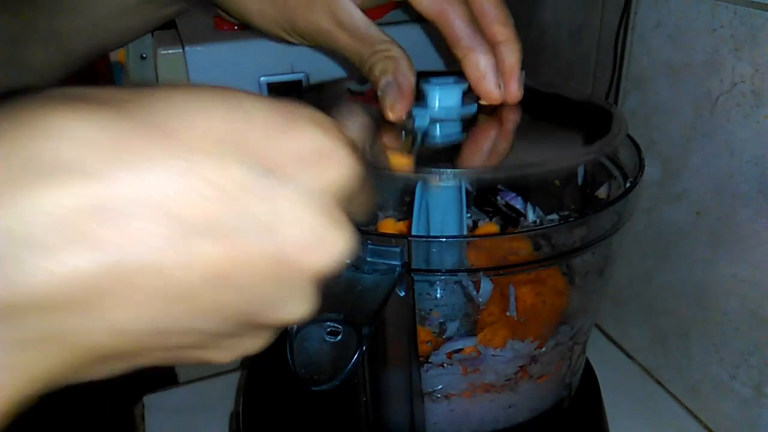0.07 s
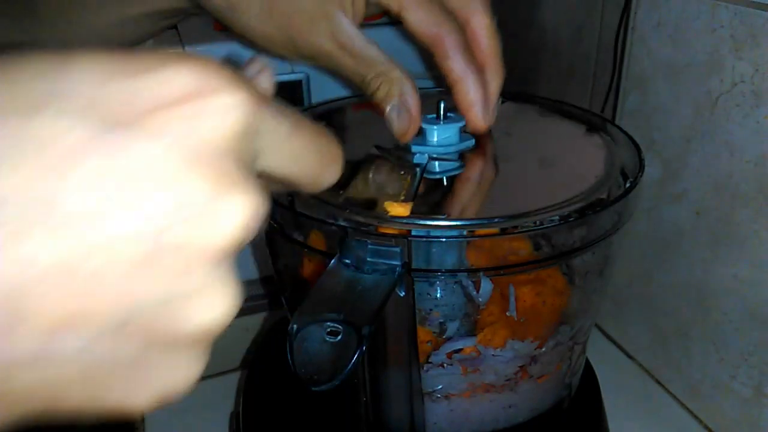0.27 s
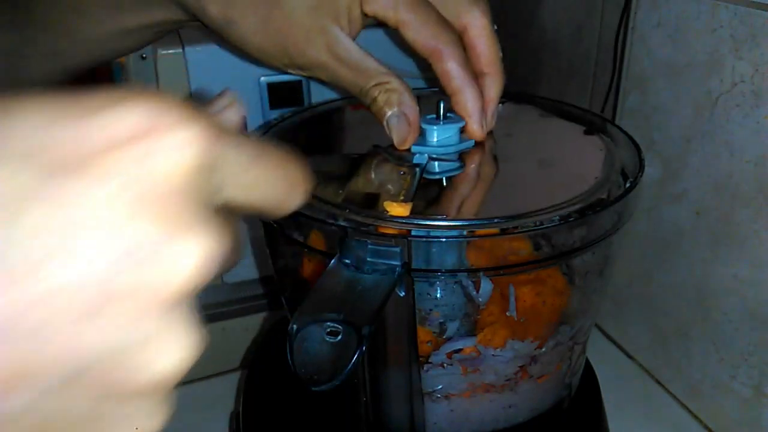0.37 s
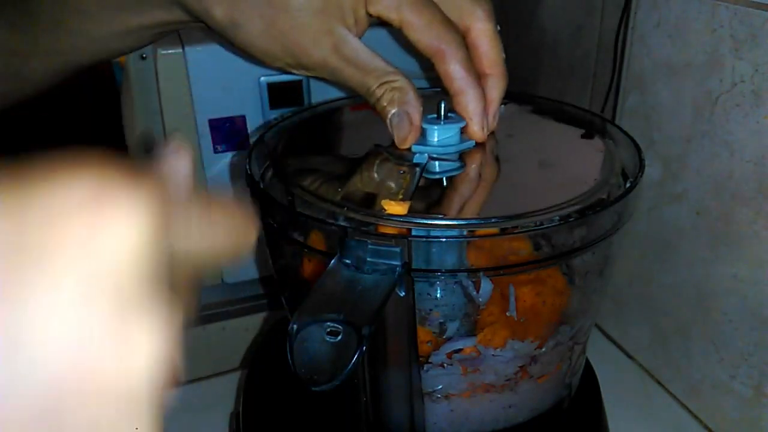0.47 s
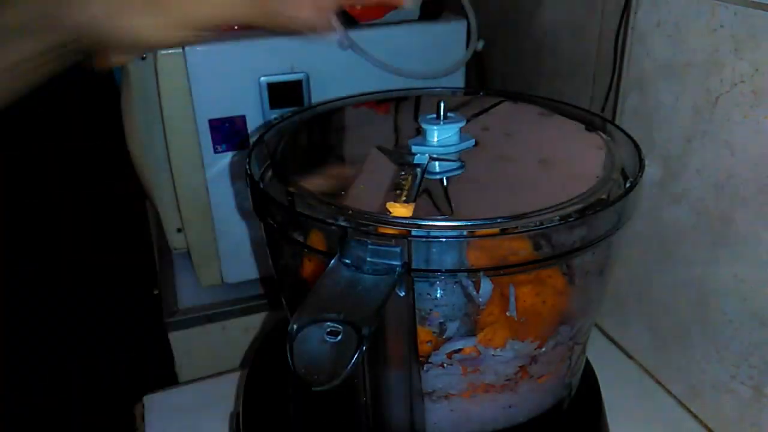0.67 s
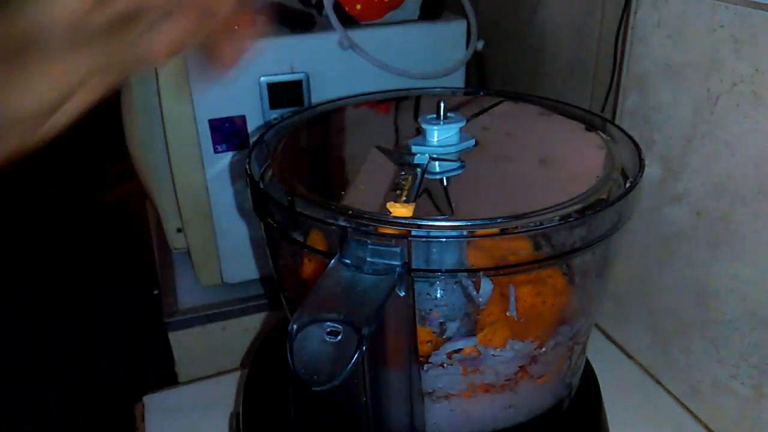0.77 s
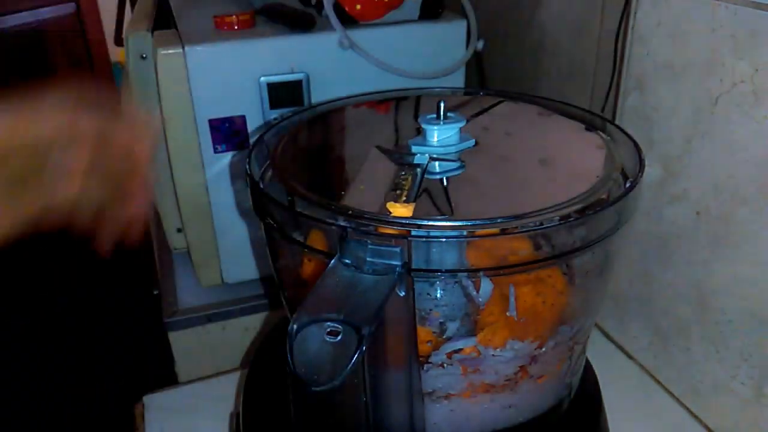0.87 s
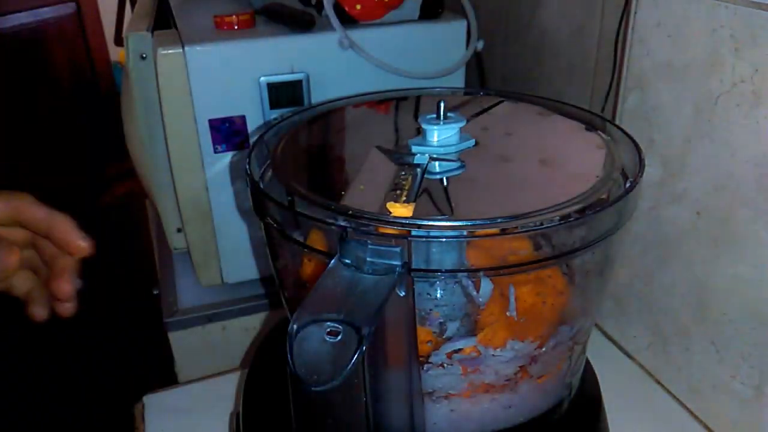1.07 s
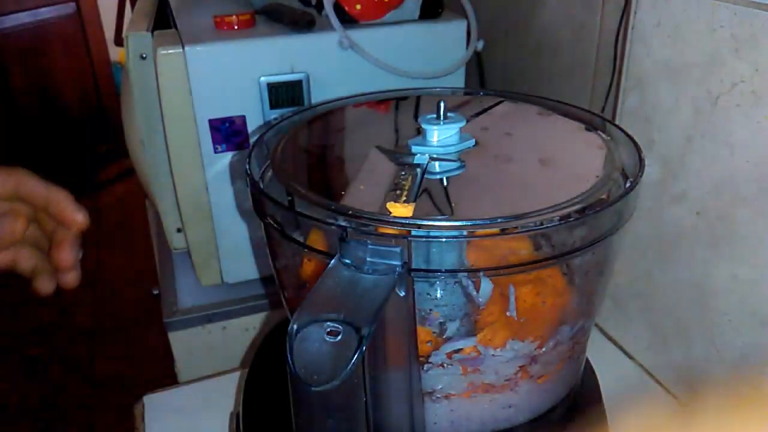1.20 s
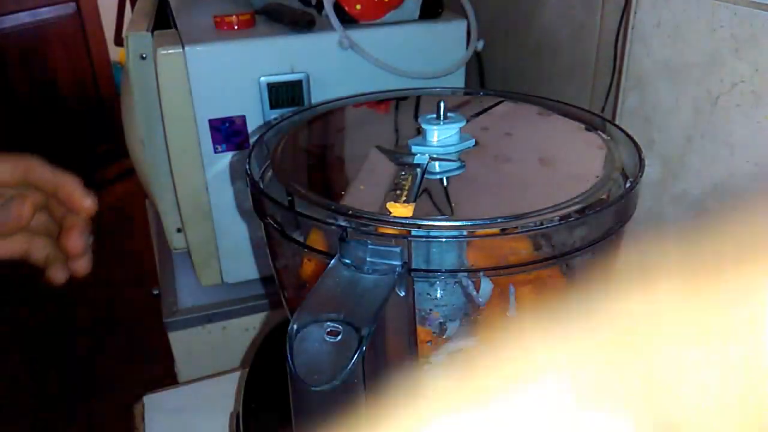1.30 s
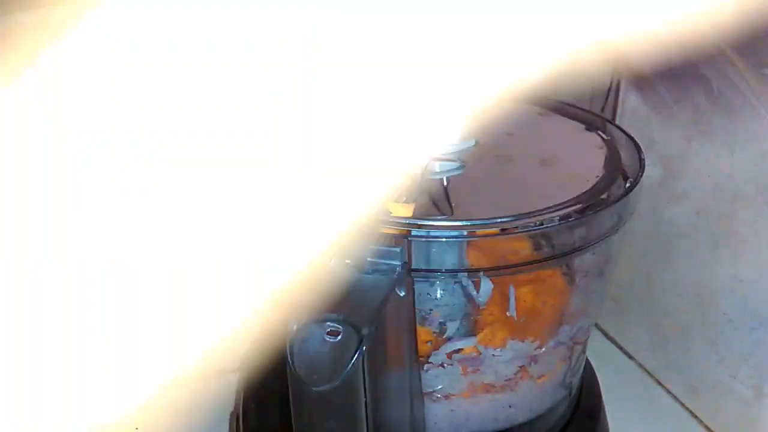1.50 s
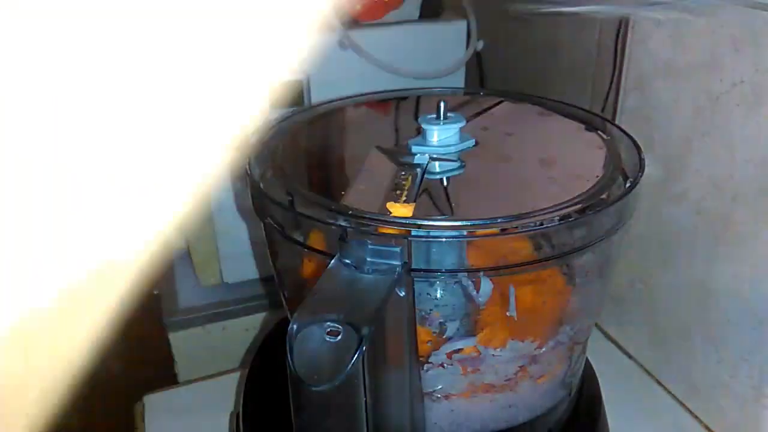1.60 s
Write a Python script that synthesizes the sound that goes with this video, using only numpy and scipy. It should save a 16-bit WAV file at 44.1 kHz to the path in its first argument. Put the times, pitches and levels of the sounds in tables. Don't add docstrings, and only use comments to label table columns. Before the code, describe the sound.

Food processor parts clack and clatter as a disc drops onto a plastic bowl and rattles into place

```python
import sys
import numpy as np
from scipy import signal
from scipy.fft import rfft, irfft
from scipy.io import wavfile

SR = 44100
rng = np.random.default_rng(int(sys.argv[2]) if len(sys.argv) > 2 else 0)


def voltage_ratio(level):
    return 10 ** (np.asarray(level, float) / 20)


def put_to_file(sound):
    columns = np.atleast_2d(sound).T
    safe = np.clip(columns, -1, 1)
    whole_steps = np.round(safe * 32767)
    wavfile.write(sys.argv[1], SR, whole_steps.astype(np.int16))


N = 72765

# pitch_hz, level_db_rms
HUM_LINES = [(58.7, -57), (119, -70), (177, -71.5), (295, -73.5)]
# frequency_hz, level_db
RUMBLE_SPECTRUM = [(11, 0), (25, -2), (36, -12), (55, -16), (85, -12), (110, -20)]
RUMBLE_DB, RUMBLE_LEFT_DB, RUMBLE_TURN_RAD = -60, 3, 0.96
# frequency_hz, level_db
AIR_SPECTRUM = [(53, -31), (90, 2), (296, -5), (488, -13), (521, -6), (1020, -18), (1110, -27),
                (4500, -35.5), (7820, -31.5), (16000, -33)]
AIR_DB = -60.5


# start_s, peak_db, contact_ms, tilt_db_per_octave, ring_db
DISC_DROPS = [
    (0.052, -58.5, 1.2, -3, 4.5),
    (0.2003, -8.5, 5.6, 3, 2),
    (0.2625, -9, 4.05, 2.5, 1.5),
    (0.268, -22, 1.1, -8, 5.5),
    (0.2968, -20.5, 7.7, 2, 5.5),
    (0.322, -33.5, 11, -8.5, 12),
    (0.339, -36.5, 5.5, 5, 8),
    (0.2003, -5.5, 0.48, 4.5, -23.5),
]
# frequency_hz, level_db
DROP_CRACK = [(400, -34), (750, 13.5), (1080, 2.5), (1600, 2), (3300, -0.5), (7500, -8.5), (9500, -18),
              (15500, -25.5)]
# pitch_hz, level_db, t60_s
BOWL_MODES = [(123.5, -14.5, 0.29), (199, -25, 0.24), (502, -15.5, 0.46), (535.3, -12.5, 0.41),
              (556, -9, 0.34), (606.6, -7.5, 0.19), (651, -3.5, 0.23), (714, -3.5, 0.087),
              (804, -2.5, 0.036), (806, -5.5, 0.16), (848, 0, 0.1), (950, -10, 0.031), (1292, -8, 0.071),
              (1548, -14, 0.089)]
# pitch_hz, level_db, t60_s
DISC_MODES = [(1998, -15, 0.05), (2230, -13.5, .11), (2854, -14.5, 0.052), (3383, -14, 0.097),
              (3590, -20, .05), (4008, -19, 0.12), (4270, -25, 0.063), (5510, -15.5, 0.059),
              (6680, -21, 0.058), (6930, -16, 0.021), (7700, -19.5, 0.04)]

# time_s, level_db
SLIDE_LEVEL = [
    (0.08, -104),
    (0.13, -69),
    (0.17, -56),
    (0.198, -45.5),
    (0.21, -45.5),
    (0.96, -93),
    (0.995, -66.5),
    (1.05, -55.5),
    (1.15, -55),
    (1.2, -106),
]
# frequency_hz, level_db
RUB_COLOUR = [(300, -7), (700, 1), (1500, 2), (3000, -9), (7500, -9.5), (15500, -20)]

# start_s, peak_db, contact_ms, tilt_db_per_octave, ring_db
SMALL_TICKS = [
    (0.6512, -36, 7.7, 4.5, -3.5),
    (0.655, -40, 7.5, 1, 4),
    (1.047, -49, 2.4, 7, -22),
    (1.0625, -51.5, 15, 1.5, 13.5),
]
# frequency_hz, level_db
TICK_CRACK = [(300, -33), (700, 6), (1700, 7.5), (2800, -4), (5000, -3.5), (8000, -8.5), (15500, -16)]
# pitch_hz, level_db, t60_s
SMALL_MODES = [(510, -2, 0.11), (702, 1.5, 0.074), (1440, -6, 0.011), (1630, 7, 0.021), (4250, -11, 0.026),
               (5160, -16.5, 0.067), (7200, -13, 0.014)]

# start_s, peak_db, contact_ms, tilt_db_per_octave, ring_db
HAND_TAPS = [
    (0.868, -52, 4, -4, -5),
    (1.4335, -30.5, 5.7, 0, 2),
    (1.4385, -39, 3.3, 5, 0),
    (1.462, -42, 3.4, -14, 6),
    (1.5525, -31.5, 6.1, -5, -4.5),
    (1.5575, -37.5, 6.3, 3.5, 1.5),
]
# frequency_hz, level_db
TAP_CRACK = [(500, -25), (1200, -12), (1900, 0), (2450, -7), (3100, 1), (3700, -20), (15500, -40)]
# pitch_hz, level_db, t60_s
TAPPED_MODES = [(925, -3.5, 0.038), (1930, 2, 0.014), (2270, -4.5, .02), (3010, -9, 0.012)]

# start_s, peak_db, contact_ms, tilt_db_per_octave, ring_db
LID_GRAZES = [
    (1.1043, -28.5, 6.9, -2.5, -3.5),
    (1.1085, -37, 3.2, -1.5, 0),
]
# pitch_hz, level_db, t60_s
GRAZED_MODES = [(600, -2, .025), (802, 0, .03), (1240, -7, .025), (1800, -8, .03), (2600, -10, .015),
                (3590, -15, .02), (4010, -13, .025)]

# time_s, level_db
RATTLE_LEVEL = [
    (1.15, -71.5),
    (1.16, -35),
    (1.185, -64),
    (1.2, -38.5),
    (1.222, -38),
    (1.235, -31),
    (1.265, -45),
    (1.285, -44),
    (1.32, -72),
]
# start_s, peak_db, contact_ms, tilt_db_per_octave, ring_db
RIM_CLICKS = [(1.1555, -9.5, 6.6, -0.5, 2), (1.1705, -22, 1.3, -10, 12), (1.178, -23, 1.1, -11, 12),
              (1.1835, -22.5, 1.2, -6.5, 9), (1.1907, -17, 3.9, -1.5, 4), (1.207, -27.5, 1.4, 6, -6),
              (1.2245, -17.5, 3.8, 2, -6), (1.2305, -23, 3.8, -2, 7), (1.2545, -21, 3.9, 4, -5),
              (1.273, -40, 5, 7.5, 7.5), (1.289, -34, 3, 6.5, -13)]
# pitch_hz, level_db, t60_s
RIM_MODES = [(3043, -5, 0.018), (3166, -6, 0.016), (3780, -6.5, 0.024), (4435, -9, 0.021),
             (4900, -8.5, .02), (5210, -6, 0.021), (5660, -3, 0.022), (6700, -11, 0.012), (7300, -7, 0.016),
             (7660, -9, 0.021), (9950, -14, 0.015), (11340, -14.5, 0.015)]

# start_s, peak_db, contact_ms, tilt_db_per_octave, ring_db
LID_KNOCKS = [
    (1.1575, -17, 2, 2, -2),
    (1.1935, -18.5, 6, -4, 6.5),
    (1.2272, -15.5, 5.7, 1, 5),
    (1.2355, -23.5, 2.8, 3, 3.5),
    (1.2415, -19, 8.4, 0, 4),
    (1.2575, -22.5, 5.8, 2.5, 5),
    (1.2665, -31, 4.9, -4, 2),
]
# frequency_hz, level_db
KNOCK_CRACK = [(150, -49.5), (500, 8), (1500, -1.5), (3100, 5), (5000, 7.5), (7500, 4), (9500, -2),
               (15500, -7)]
# pitch_hz, level_db, t60_s
LID_MODES = [(306, -19, 0.035), (516, -9, 0.055), (800, -7, 0.0515), (1152, -4.5, 0.067), (1322, -4, 0.066),
             (1464, -11, 0.13), (1769, -8, 0.05), (1803, -6.5, 0.052), (1961, -3, 0.048),
             (2024, -0.5, 0.044), (2400, -8, 0.047), (2550, -11.5, 0.03)]

# start_s, peak_db, contact_ms, tilt_db_per_octave, ring_db
LID_SEATS = [
    (1.2045, -30, 5, -3, 5),
    (1.213, -28, 4.7, -3, 6),
    (1.250, -32, 6, -2, 9),
    (1.2708, -29, 6, -2.5, 11),
    (1.2838, -34, 5, -3, 11),
]
# pitch_hz, level_db, t60_s
SEATED_MODES = [(490, -4, .08), (768, 1, .13), (1160, -10, .08), (1450, -4, .11), (2430, -17, .04)]

# frequency_hz, t60_s
KITCHEN_T60 = [(125, 0.53), (500, 0.42), (1500, 0.54), (4000, 0.41), (8000, 0.38), (15000, 0.19)]
# frequency_hz, correlation
LIKENESS = [(100, .95), (500, .85), (1200, .55), (3000, .15), (8000, 0)]
WALLS_DB, EARLY_DB, EARLY_T60_S, FIRST_ECHO_S = -6.5, -8.5, 0.035, 0.00079
# frequency_hz, level_db
RIGHT_LIFT = [(100, 3), (500, 3), (1500, 1.5), (3000, -1), (6000, 4.5), (9000, 7.5), (14000, 18)]
# frequency_hz, level_db
PORT_RESONANCE = [(5500, -1), (6800, 1.5), (7600, 5), (8400, 2.5), (9200, 1), (11000, 0.5)]
LEFT_SHARE, RIGHT_LAG_S = 0.86, 0.00015

CONTACTS_PER_S, RISE_SHARE = 7600, 0.25
PORT_OWN_SHARE = 0.7
BODY_CONTACT_S, RING_TILT_SHARE = 0.001, 0.6
STRIKE, STRIKE_SPREAD_DB = 5.0, 2.0
HAND_SHIELD_DB, CUTOFF_HZ = -6, 15800
EDGES_HZ = 90 * 2 ** np.arange(0, 7.6, 0.5)


def rms_one(x):
    return x / np.sqrt(np.mean(x ** 2) + 1e-20)


def at_hz(points, hz):
    table = np.array(points)
    return np.interp(np.log(hz), np.log(table[:, 0]), table[:, 1])


def in_time(points):
    return voltage_ratio(np.interp(np.arange(N) / SR, *np.transpose(points)))


def bands():
    return [(np.sqrt(low * high), signal.butter(2, [low, high], "band", fs=SR, output="sos"))
            for low, high in zip(EDGES_HZ, EDGES_HZ[1:])]


def colour(x, spectrum):
    size = 4096
    log_gain = at_hz(spectrum, np.fft.rfftfreq(size, 1 / SR) + 1) * np.log(10) / 20
    fold = np.r_[1, 2 * np.ones(size // 2 - 1), 1, np.zeros(size // 2 - 1)]
    response = irfft(np.exp(rfft(irfft(log_gain, size) * fold)), size)
    return signal.fftconvolve(x, response)[:len(x)]


def pair(noises, hz):
    alike = np.clip(at_hz(LIKENESS, hz), 0, 1)
    common, opposed = noises
    return np.sqrt((1 + alike) / 2) * common + np.sqrt((1 - alike) / 2) * opposed * [[1], [-1]]


def refrigerator():
    t, hz = np.arange(N) / SR, np.fft.rfftfreq(N, 1 / SR) + 0.00084
    waver = 1 + 0.24 * rms_one(np.interp(t * 14, np.arange(30), rng.standard_normal(30)))
    lines = 0
    for pitch_hz, db in HUM_LINES:
        lines = lines + voltage_ratio(db) * np.sqrt(2) * np.sin(2 * np.pi * pitch_hz * t + rng.uniform(0, 2.9))
    spectrum = rfft(rng.standard_normal(N)) * voltage_ratio(at_hz(RUMBLE_SPECTRUM, hz))
    rumble = rms_one(irfft(spectrum * (hz > 12) * (hz < 110), N))
    left = lines * waver + voltage_ratio(RUMBLE_DB) * rumble
    turn_rad = RUMBLE_TURN_RAD + 0.83 * (hz > 90)
    right = irfft(rfft(left) * np.exp(-1j * turn_rad), N)
    return np.array([voltage_ratio(RUMBLE_LEFT_DB) * left, voltage_ratio(-RUMBLE_LEFT_DB) * right])


def air():
    white, out = rng.standard_normal((2, 2, N)), 0
    for k, (hz, sos) in enumerate(bands()):
        out = out + voltage_ratio(at_hz(AIR_SPECTRUM, hz)) * pair(signal.sosfilt(sos, white[k % 2]), hz)
    return voltage_ratio(AIR_DB + 4.5) * rms_one(out)


def ring(x, modes):
    out = 0
    for hz, db, t60_s in modes:
        radius, turn = voltage_ratio(-60 / (t60_s * SR)), 2 * np.pi * hz / SR
        poles = [1, -2 * radius * np.cos(turn), radius * radius]
        mode = signal.lfilter([0, np.sin(turn)], poles, x + 1e-18)
        out = out + voltage_ratio(db) * np.sign(hz - 450) * mode
    return out


def grit(count):
    sizes = voltage_ratio(5.8 * np.minimum(rng.exponential(1, count), 3)) * rng.choice([-1, 1], count)
    return rms_one(sizes * (rng.random(count) < CONTACTS_PER_S / SR))


def blows(events, crack, modes, crack_db, ring_db):
    out, t = np.zeros((2, N + SR)), np.arange(SR // 4) / SR
    for start_s, peak_db, contact_ms, tilt_db, own_ring_db in events:
        lengths = t * 1000 / max(contact_ms, 0.3)
        swell = np.exp(-lengths) * np.minimum(1, lengths / RISE_SHARE)
        shared, left, right = (grit(len(t)) * swell for _ in range(3))
        shared[0] = 0.71
        tilted = [(hz, db + tilt_db * np.log2(hz / 2000)) for hz, db in crack]
        struck = []
        for hz, db, t60_s in modes:
            mode_tilt_db = RING_TILT_SHARE * tilt_db * np.log2(max(hz, 700) / 1000)
            struck.append((hz, db + mode_tilt_db + rng.normal(0, STRIKE_SPREAD_DB), t60_s))
        cracks = np.array([colour((1 - PORT_OWN_SHARE) * shared + PORT_OWN_SHARE * own, tilted)
                           for own in (left, right)])
        push = shared * np.exp(-t / BODY_CONTACT_S) + STRIKE * (t == 0)
        sound = voltage_ratio(crack_db) * cracks + voltage_ratio(ring_db + own_ring_db) * ring(push, struck)
        i = int(start_s * SR)
        out[:, i:i + len(t)] += voltage_ratio(peak_db) * sound * np.minimum(1, (t[-1] - t) * 40)
    return out[:, :N]


def disc_drop():
    return blows(DISC_DROPS, DROP_CRACK, BOWL_MODES + DISC_MODES, crack_db=4.5, ring_db=-23.5)


def slide():
    rub = rms_one(colour(grit(N) + 1.3 * rng.standard_normal(N), RUB_COLOUR))
    squeak = rms_one(ring(rng.standard_normal(N), [(3650, 0, 0.0034)]))
    squeak = squeak * (np.arange(N) < SR // 2)
    return in_time(SLIDE_LEVEL) * (rub + voltage_ratio(-10.5) * squeak)


def small_ticks():
    return blows(SMALL_TICKS, TICK_CRACK, SMALL_MODES, crack_db=0, ring_db=-21)


def hand_taps():
    return blows(HAND_TAPS, TAP_CRACK, TAPPED_MODES, crack_db=2.5, ring_db=-28)


def lid_graze():
    return blows(LID_GRAZES, KNOCK_CRACK, GRAZED_MODES, crack_db=-5, ring_db=-13)


def rattle():
    runs = [grit(N) * in_time(RATTLE_LEVEL) for _ in range(2)]
    cracks = np.array([colour(run, KNOCK_CRACK) for run in runs])
    return voltage_ratio(2) * cracks + voltage_ratio(-23.5) * ring(runs[0], LID_MODES + RIM_MODES)


def rim_clicks():
    return blows(RIM_CLICKS, KNOCK_CRACK, RIM_MODES, crack_db=-5.5, ring_db=-28)


def lid_knocks():
    return blows(LID_KNOCKS, KNOCK_CRACK, LID_MODES, crack_db=-5.5, ring_db=-28)


def lid_seats():
    return blows(LID_SEATS, KNOCK_CRACK, SEATED_MODES, crack_db=-6, ring_db=-25)


def kitchen(x):
    t, response = np.arange(SR) / SR, 0
    white = rng.standard_normal((2, 2, SR))
    early = voltage_ratio(EARLY_DB - 60 * t / EARLY_T60_S) / 15
    for k, (hz, sos) in enumerate(bands()):
        tail = voltage_ratio(WALLS_DB - 60 * t / at_hz(KITCHEN_T60, hz)) * np.minimum(1, t / 0.0072) / 45
        noise = pair(signal.sosfilt(sos, white[k % 2]), hz)
        response = response + noise * (tail + early) * (t > FIRST_ECHO_S)
    return signal.fftconvolve(x, response, axes=1)[:, :N]


def ports(x):
    hz, db = np.transpose(RIGHT_LIFT)
    left = colour(colour(x[0], np.c_[hz, -db * LEFT_SHARE]), PORT_RESONANCE)
    right = colour(colour(x[1], np.c_[hz, db * (1 - LEFT_SHARE)]), PORT_RESONANCE)
    late = np.r_[np.zeros(int(RIGHT_LAG_S * SR)), right][:N]
    return np.array([left, -late])


def scene():
    loud = disc_drop() + slide() + rattle() + rim_clicks() + lid_knocks() + lid_seats()
    loud = signal.sosfilt(signal.butter(2, 90, "high", fs=SR, output="sos"), loud)
    small = small_ticks() + hand_taps() + lid_graze()
    room = kitchen(loud + voltage_ratio(HAND_SHIELD_DB) * small)
    return ports(loud + small + room + air()) + refrigerator()


def roll_off(x):
    return signal.sosfilt(signal.butter(12, 16820, fs=SR, output="sos"), x)


def record(dry):
    rounded = 0.9 * np.tanh(dry / 0.88)
    mix = signal.sosfilt(signal.cheby2(8, 30, CUTOFF_HZ, fs=SR, output="sos"), rounded)
    return roll_off(mix)


dry = scene()
out = record(dry)
put_to_file(out)
```